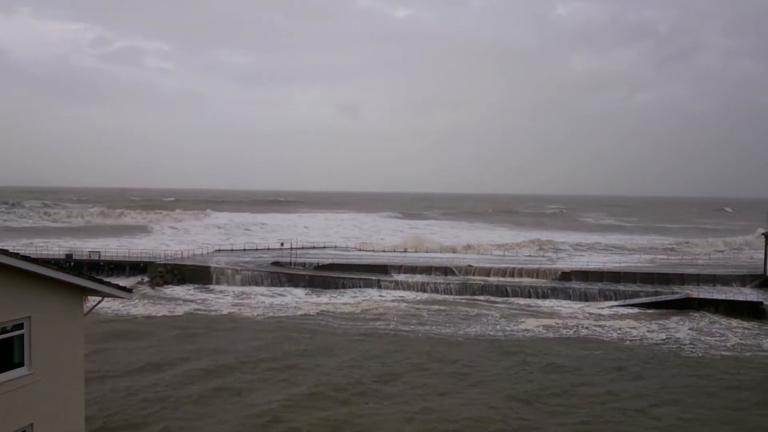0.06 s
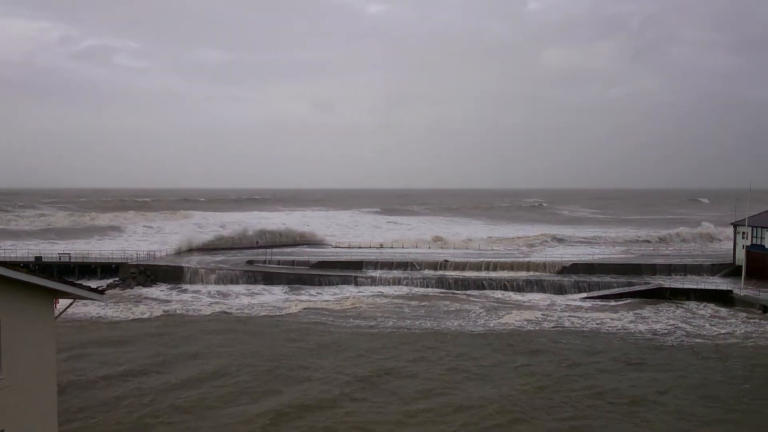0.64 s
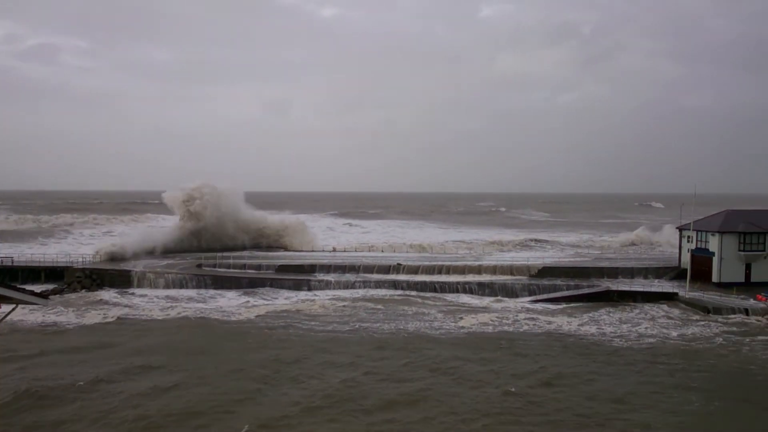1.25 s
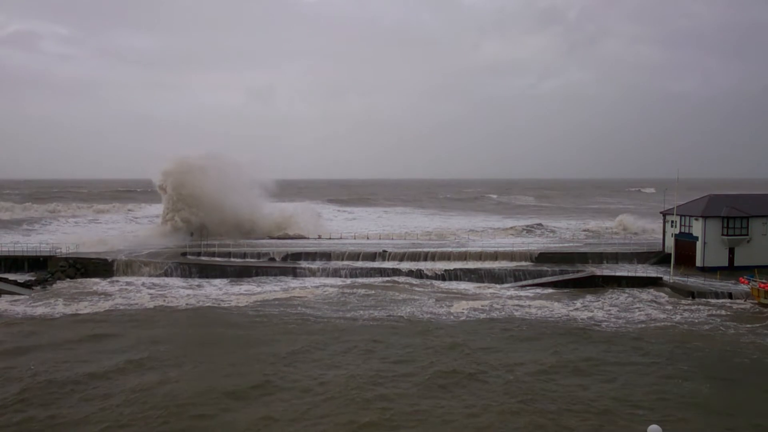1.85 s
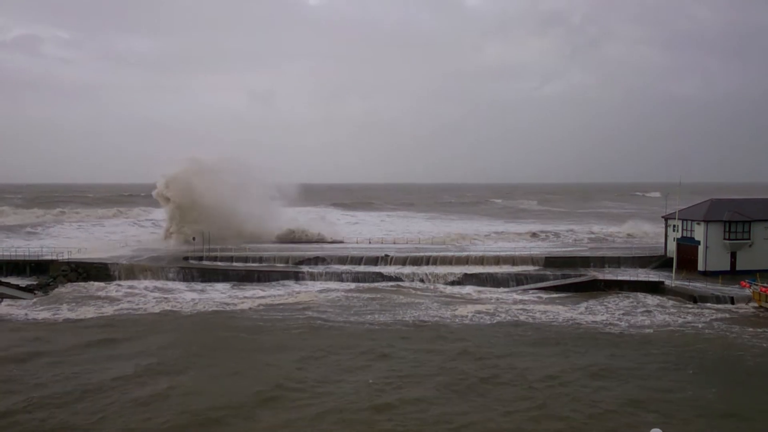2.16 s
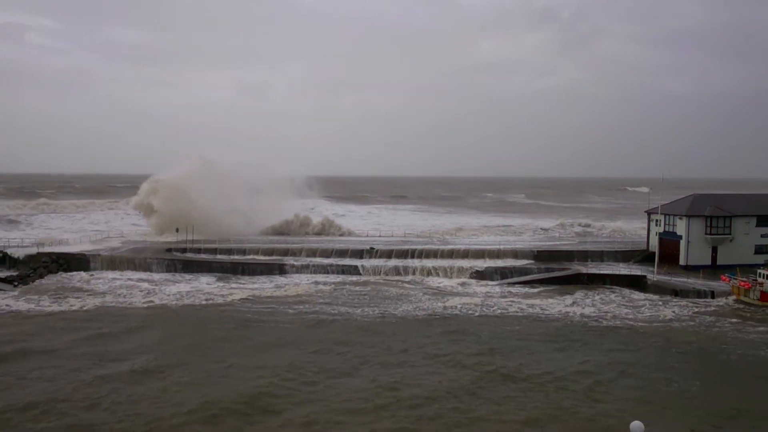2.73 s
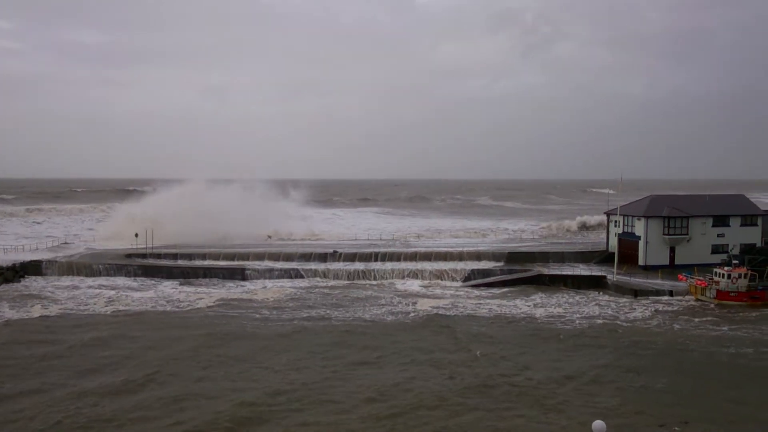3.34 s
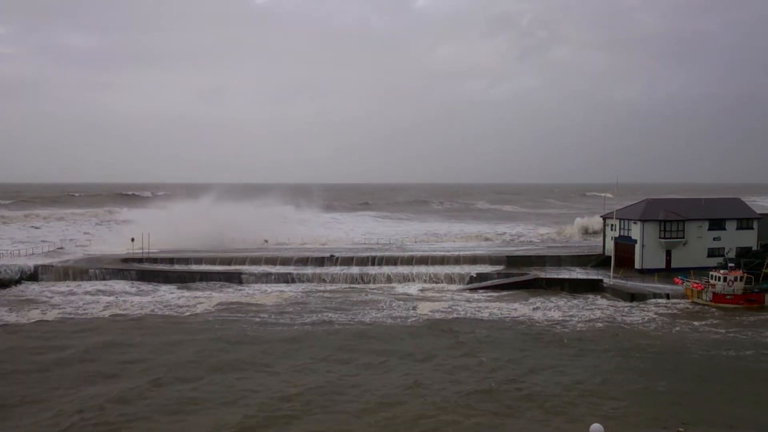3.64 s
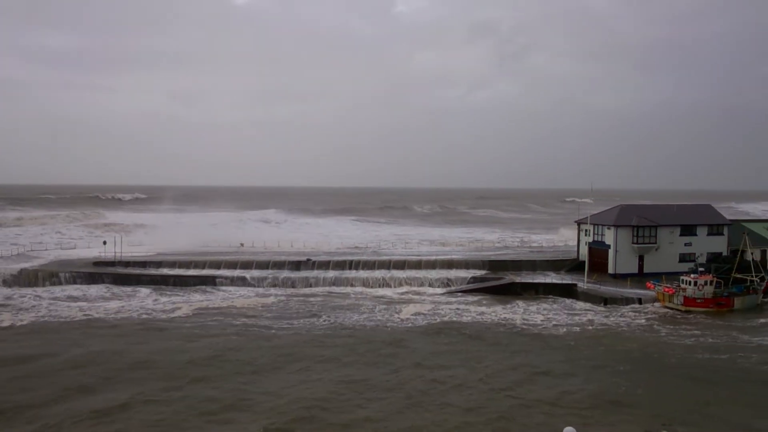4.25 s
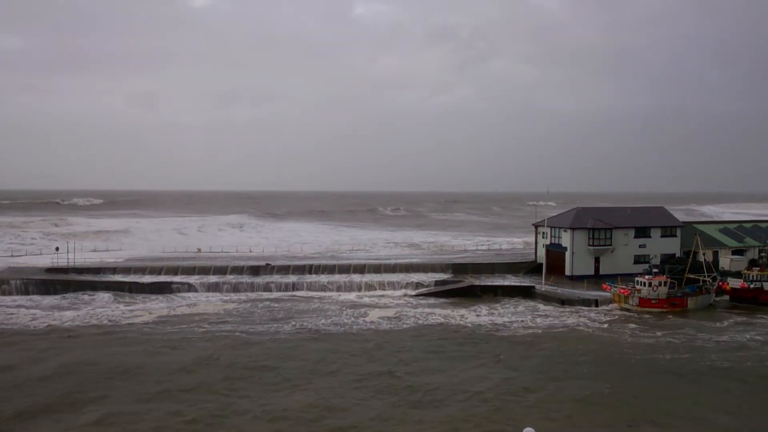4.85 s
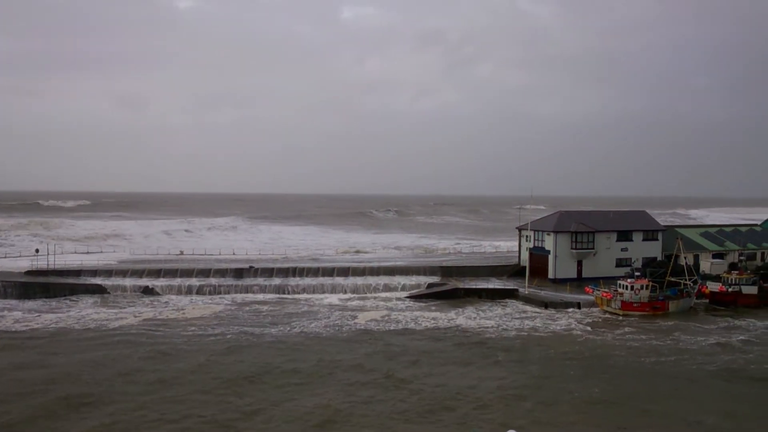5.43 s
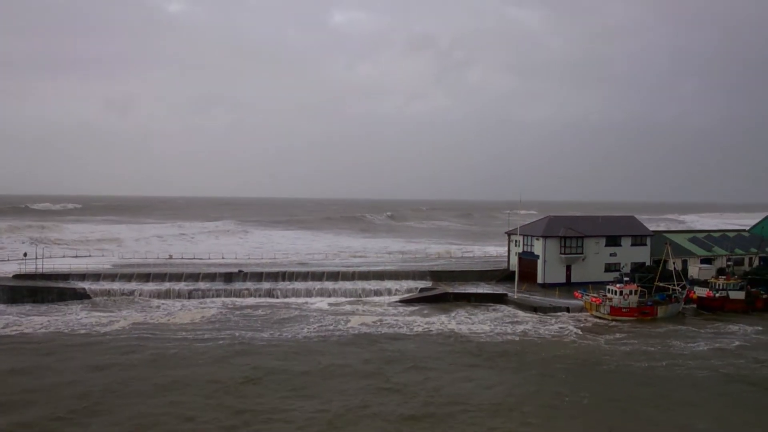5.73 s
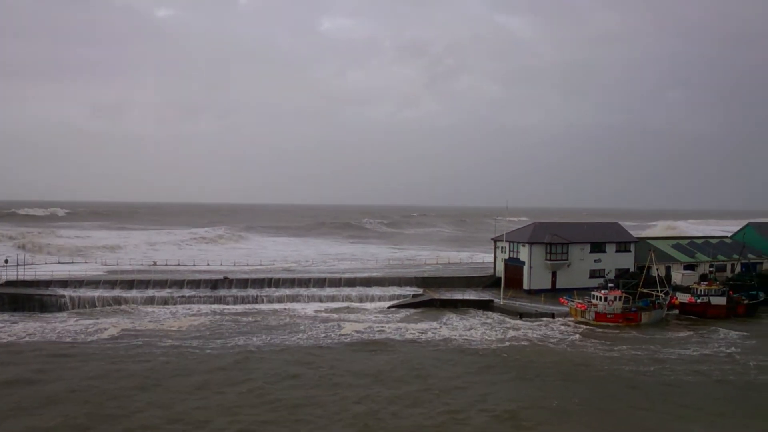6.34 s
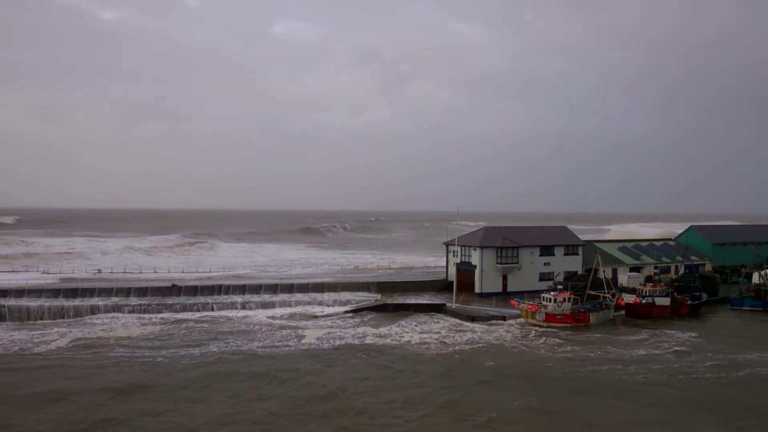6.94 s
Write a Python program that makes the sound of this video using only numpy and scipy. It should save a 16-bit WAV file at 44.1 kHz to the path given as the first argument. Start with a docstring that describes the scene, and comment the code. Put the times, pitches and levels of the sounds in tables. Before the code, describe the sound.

A gale blows straight onto the microphone above a harbour wall, making a loud, fluttering low rumble. Gusts swell unevenly from side to side, with dull thumps, quick slaps and small dry ticks, and the hardest blows briefly overload the sound. Behind the wind, heavy surf makes an even roar and hiss that dips under each big blow. A fine high hiss swells once near the end.

```python
"""Above a harbour wall, a gale blows straight onto a camera's two microphone ports.
Turbulent pressure gives each port its own rumble and fluttering eddies, and gusts swell over them.
Large eddies thump, small fast ones slap, and the smallest sputter as dry ticks; the heavy blows
overload the recorder. Behind the buffeting lies the even roar and hiss of heavy surf, which ducks
whenever the limiter catches a blow. A fine high hiss swells once near the end."""
import sys
import numpy as np
from scipy import signal
from scipy.fft import rfft, irfft
from scipy.io import wavfile
from scipy.ndimage import uniform_filter1d

SR = 44100
rng = np.random.default_rng(int(sys.argv[2]) if len(sys.argv) > 2 else 0)


def bounce(signal):
    """Save signal as a 16-bit WAV file at the path given by the first command-line argument."""
    frames = np.transpose(np.atleast_2d(signal))
    limited = np.clip(frames, -1, 1)
    pcm = np.round(limited * 32767).astype(np.int16)
    wavfile.write(sys.argv[1], SR, pcm)


N = 316638
TIME = np.arange(N) / SR
BINS = np.fft.rfftfreq(N, 1 / SR)

# Wind strength between gusts: time_s, level_db (levels in all tables are relative)
WIND_LEFT = [(0.0, -5.5), (0.3, -1.5), (0.83, -7), (1.1, -0.5), (1.47, -7.5), (1.97, -1), (2.71, -5.5),
             (3.33, 1.5), (3.52, 4), (4.13, -2.5), (4.25, -5.5), (4.73, -2.5), (5.14, -4.5), (5.8, -5),
             (6.22, -2), (6.46, -11), (6.93, 3), (7.18, 2.5)]
WIND_RIGHT = [(0.0, 4.5), (0.16, 7.5), (0.185, 0), (0.55, 2.5), (0.68, -17.5), (1.03, -18), (1.109, -2),
              (1.83, 1.5), (2.43, -4.5), (2.95, -6.5), (3.13, 2.0), (3.93, -4.5), (4.23, 4.5), (4.57, -3.5),
              (5.5, -12.5), (5.57, 0), (6.73, -9), (7.18, -1)]
# Gusts, and surges or lulls of the rumble, by port: centre_s, length_s, change_db
GUSTS = {"left": [(.42, 0.15, 8.5), (.686, .076, 9.5), (1.353, 0.099, 3), (1.536, 0.38, 5),
         (1.852, 0.12, 8.5), (2.524, 0.18, 5.5), (3.063, 0.3, 6.5), (3.85, 0.26, 5.5), (4.519, 0.14, 15.5),
         (5.425, .25, 7.5), (6.627, 0.26, 9.5)], "right": [(.424, 0.11, 3.5), (1.732, 0.057, 5.5),
         (2.305, .12, 7), (2.621, 0.34, 7), (2.761, 0.13, 9.5), (3.076, 0.12, -0.5), (3.384, 0.58, 3),
         (4.724, .33, 6), (4.921, 0.22, 7.5), (5.128, 0.2, 8), (5.329, 0.29, 9), (6.43, 0.18, 12),
         (6.95, 0.28, 6.5)]}
RUMBLE_SURGES = {"left": [(.17, .1, -6), (.38, 0.12, 4), (.55, .12, -3), (.78, 0.27, -6), (1.12, 0.55, -3),
                 (1.78, .1, -10), (3, 0.075, -10), (3.37, .1, -12), (3.67, 0.19, -2.5), (4.12, 0.2, 6.5),
                 (4.27, .12, -6), (4.72, 0.14, 3), (5.02, 0.13, 7), (5.13, 0.11, -6), (5.41, 0.077, 3),
                 (6.15, 0.4, 2), (6.35, 0.087, -5.5)], "right": [(.47, .24, 3.5), (.73, .1, -6),
                 (.99, 0.25, -6), (1.3, 0.12, -3), (2, 0.064, -7), (2.96, 0.13, -7), (3.21, 0.091, -8),
                 (3.97, .12, -4), (4.37, .28, 0), (5.03, 0.14, -5), (5.48, 0.13, -7), (5.85, 0.42, -1.5),
                 (6.25, 0.26, -4), (6.73, .08, -4), (6.9, .2, 3)]}
# Spectra of turbulence, from large eddies to fine: frequency_hz, density_db
RUMBLE_SPECTRUM = [(8, -62), (24, -35), (35, -16.5), (48, -5.5), (68, -4), (100, -8), (150, -14.5),
                   (230, -20), (450, -41), (1200, -100)]
BUFFET_SPECTRUM = [(50, -5), (110, -8), (180, -3), (300, -5), (500, -12.5), (900, -21), (1800, -35),
                   (4000, -88)]
RASP_SPECTRUM = [(200, -33), (450, 0.5), (700, -2.5), (1100, -8), (1600, -14), (2200, -24), (3200, -30),
                 (5000, -43), (12000, -81)]
SPIT_SPECTRUM = [(300, -12), (700, 7), (1300, -1), (2200, -7.5), (3400, -29), (14000, -73)]
def wind(port, strength, shield, rumble_db, buffet_db, rasp_db, spit_db, brightening, unrest_db):
    """Turbulent pressure at one port: large eddies rumble, small ones thud and rasp in brief bursts."""
    rumble_share, lull_db, shield_db = 0.48, 3.5, -1.5
    wind_db = np.interp(TIME, *np.transpose(strength)) + arches(GUSTS[port])
    wind_db += unrest_db * flutter(slow_hz=7.6, fast_hz=6.8)
    large_db = rumble_share * wind_db + arches(RUMBLE_SURGES[port])
    large_db += lull_db * np.tanh(flutter(slow_hz=7.7, fast_hz=11))
    eddies = 1.75 * np.tanh(flutter(slow_hz=17.6, fast_hz=79.3) / 0.92)
    rumble = steadied(noise(RUMBLE_SPECTRUM) * gain_of(eddies), span_s=0.045)
    buffet = steadied(noise(BUFFET_SPECTRUM) * gain_of(5.3 * eddies), span_s=0.057)
    lows = gain_of(large_db + rumble_db) * rumble + gain_of(wind_db + buffet_db) * buffet
    # The finest eddies ride inside the small ones and grow faster than they do in a gust.
    fine_gain = gain_of(wind_db + brightening * (wind_db - wind_db.mean()))
    bursts = steadied(gain_of(4.7 * eddies + 3.6 * flutter(slow_hz=60, fast_hz=282)), span_s=0.24)
    fiercest = steadied(bursts ** 1.55, span_s=0.14)
    spits = gain_of(spit_db) * fiercest * noise(SPIT_SPECTRUM)
    rasp = gain_of(rasp_db) * bursts * noise(RASP_SPECTRUM)
    return gain_of(shield_db * shield) * lows + fine_gain * (rasp + spits)


# Coupling of a blow to the ports: left_share, right_share
PORT_REACH = {"left": (1, 0), "right": (0, 1), "both": (1, 1)}
# Large eddies, by port: centre_s, length_s, pitch_hz, level_db
THUMPS = {"left": [(.645, .024, 110, 3.5), (1.356, .051, 99, -4), (1.867, .051, 102.8, -7),
          (2.115, .074, 139.9, 1), (2.182, 0.024, 106, 7.5), (2.521, .057, 111.8, -0.5),
          (3.171, 0.051, 135.7, -1.5), (3.538, 0.054, 117.4, 1.5), (3.624, .048, 166, 3.5),
          (3.889, 0.019, 168, 4.5), (4.044, 0.052, 117.6, -1.5), (4.469, 0.056, 178.4, 1.5),
          (4.513, 0.033, 249, 5.5), (4.72, .09, 111.2, -1.5), (4.963, 0.028, 136.6, 6.5),
          (5.256, .053, 118.3, 0), (5.419, .056, 112.7, -11), (5.621, .038, 67.5, 7.5),
          (6.588, .066, 95.9, 5.5), (6.685, 0.023, 144, 6), (7.005, .041, 128.3, 3.5),
          (7.055, 0.056, 134.9, 1)], "right": [(.038, 0.047, 195.4, -2.5), (.083, .04, 173, 6.5),
          (.409, .017, 296.6, 2.5), (.465, 0.015, 258.3, 6.5), (.553, 0.029, 124, 6),
          (.801, .061, 125, -9.5), (1.529, 0.035, 185.5, -4), (1.713, .038, 139.8, -1),
          (1.764, 0.033, 135.3, 1), (1.936, 0.04, 143, 4.5), (2.655, 0.053, 156.4, -2),
          (2.757, 0.018, 202, 1), (2.781, .05, 141.7, -1.5), (3.146, 0.015, 255.6, -1),
          (3.277, 0.037, 137.5, 2), (4.238, .035, 166.8, 2.5), (4.305, 0.039, 112.8, 2.5),
          (4.417, 0.035, 138.3, .5), (4.468, .029, 153, 2.5), (4.92, .036, 117, 1), (5.311, 0.025, 112, 2),
          (6.456, .067, 111, -4), (6.836, 0.027, 122.7, -4)], "both": [(.388, .035, 86.6, 0),
          (3.103, .05, 147, 2.5), (3.818, .04, 153, -0.5), (4.145, .04, 116.4, -1.5),
          (5.399, .014, 131, -0.5)]}
def thumps(gain_db, uneven_db):
    """Forced vibration: large eddies heave the diaphragms. Also gives their shielding of a port, 0-1."""
    swings, shield = np.zeros((2, 2, N))
    waver_octaves = .45
    pace = 2 ** (waver_octaves * flutter(slow_hz=35, fast_hz=90))
    for port, rows in THUMPS.items():
        for (centre_s, length_s, pitch_hz, level_db), phase in zip(rows, rng.random(len(rows))):
            near = abs(TIME - centre_s) < 2 * length_s
            offset = 2 * (TIME[near] - centre_s) / length_s
            cycles = phase + np.cumsum(pitch_hz * pace[near]) / SR
            envelope = gain_of(level_db + gain_db) * np.exp(-.55 * offset ** 4)
            swings[:, near] += np.outer(PORT_REACH[port], envelope * np.sin(2 * np.pi * cycles))
            shield[:, near] += np.outer(PORT_REACH[port], np.exp(-(offset / 2.6) ** 2))
    return swings * gain_of(uneven_db * flutter(slow_hz=26, fast_hz=80)), np.minimum(shield, 1)


# Spectra of a slap's low and high parts: frequency_hz, density_db
THUD_SPECTRUM = [(100, -7.5), (250, 0), (480, -4.5), (900, -30), (3000, -79)]
CRACK_SPECTRUM = [(1200, -13), (2800, 7), (4500, -8), (7000, -11.5), (13000, -25)]
# Slaps of air, by port: start_s, length_s, thud_db, rasp_db, crack_db
SLAPS = {"left": [(2.107, 0.0044, -4, -9.5, -45), (3.832, 0.0058, -12, -13.5, -24),
         (4.036, .005, -6.5, -10, -45), (4.522, 0.0057, -19, -10, -41)],
         "right": [(.016, 0.0029, -14, -10, -21), (.024, 0.013, -10, -14, -31), (.062, 0.0083, -1, -8, -28),
         (.102, 0.0033, -7, -15, -17.5), (.147, 0.0045, -10, -12, -23), (.164, 0.0061, -1, -4, -20),
         (.326, 0.0084, -7, -6, -32), (.405, 0.012, -5.5, -21, -27), (.457, 0.0084, -5.5, -12.5, -24),
         (.792, 0.011, -12.5, -28, -52), (1.517, 0.015, -3.5, -10.5, -20), (1.689, 0.0072, -10, -14, -25),
         (1.714, 0.0061, -18, -11, -30), (1.731, 0.0029, -13, -12, -32), (1.751, 0.0042, 3, -2.5, -25),
         (1.767, 0.0036, -26, 3, -29), (2.085, 0.0055, -8.5, -10.5, -49), (2.566, 0.0053, -6.5, -10, -29),
         (2.636, 0.02, -14.5, -11, -42), (2.749, 0.0088, -9.5, -11, -22.5), (3.078, 0.0033, -3, -10, -43),
         (3.138, 0.0041, -1, -6, -44), (3.2705, 0.003, -6, -1, -13.5), (3.287, .0025, 0.5, -4.5, -32),
         (3.679, 0.0059, -6.5, -4.5, -42), (3.788, 0.0055, -15, -6.5, -45), (4.133, 0.0058, -5.5, -4, -37),
         (4.199, .0012, -19, -7, -11), (4.218, 0.002, -3, -8, -27), (4.347, 0.0053, -15, -10.5, -45),
         (4.4, 0.007, -6, -10.5, -47), (5.305, 0.0057, -26, -9.5, -35), (5.333, 0.0069, -20, -11, -36),
         (5.56, 0.0068, -15, -12, -31), (5.648, 0.0035, -7.5, -6, -41), (6.372, 0.0058, -15, -9, -28),
         (6.409, 0.0046, -7, -14, -42), (6.822, 0.0051, -9.5, -17.5, -24.5), (6.945, .005, -4, -7.5, -35),
         (6.99, 0.0025, -4, -6, -42)]}
def slaps(thud_db, rasp_db, crack_db, rise_s, fall_s):
    """An abrupt pressure pulse is broadband: a small, fast eddy strikes with a thud, rasp and crack."""
    thud = gain_of(thud_db) * steadied(noise(THUD_SPECTRUM), span_s=0.0037)
    tearing = gain_of(6.1 * flutter(slow_hz=120, fast_hz=496))
    rasp = gain_of(rasp_db) * steadied(noise(SPIT_SPECTRUM) * tearing, span_s=0.0054)
    crack = gain_of(crack_db) * steadied(noise(CRACK_SPECTRUM) * tearing, span_s=0.0021)
    parts = np.array([thud, rasp, crack])
    pressure = np.zeros((2, N))
    for port, rows in SLAPS.items():
        for start_s, length_s, *parts_db in rows:
            near = (TIME > start_s) & (TIME < start_s + length_s + 10 * fall_s)
            age_s = TIME[near] - start_s
            envelope = (1 - np.exp(-age_s / rise_s)) * np.exp(-np.maximum(age_s - length_s, 0) / fall_s)
            blend = gain_of(parts_db) @ parts[:, near]
            pressure[:, near] += np.outer(PORT_REACH[port], envelope * blend)
    return pressure


# Spectrum of a tick: frequency_hz, density_db
TICK_SPECTRUM = [(300, -16), (900, 9), (2100, -6), (3200, -18), (4500, -26.5), (14000, -77)]
# Smallest eddies, by port: peak_s, level_db
TICKS = {"left": [(1.067, -21), (1.346, -28), (1.861, -18), (2.552, -21), (2.964, -30), (3.809, -27),
         (3.852, -21), (4.972, -19), (4.998, -22), (5.293, -22), (5.482, -17.5), (6.258, -27.5),
         (6.936, -18), (7.028, -17)], "right": [(.304, -18.5), (.128, -18), (.432, -17), (.441, -16),
         (.594, -21.5), (1.211, -22), (1.453, -17.5), (1.675, -27), (1.8, -25), (1.83, -14), (1.865, -20),
         (1.913, -16), (1.947, -18), (2.107, -23), (2.286, -17), (2.301, -15), (2.314, -22), (3.026, -22),
         (3.037, -17), (3.15, -16), (3.459, -12), (3.577, -21), (3.64, -19.5), (4.122, -16), (4.382, -23),
         (4.451, -19), (4.604, -19), (4.714, -19.5), (4.747, -14.5), (4.831, -21.5), (4.878, -21),
         (4.899, -27), (4.937, -20), (5.005, -16), (5.12, -26), (5.167, -21), (5.296, -16), (5.319, -15),
         (5.584, -14.5), (5.778, -19.5), (6.114, -18), (6.189, -18.5), (6.388, -21), (6.451, -28),
         (6.47, -21), (6.487, -19.5), (7.098, -13.5)]}
def ticks(gain_db, rise_s):
    """Intermittency of turbulence: the smallest eddies burst on a port as separate dry ticks."""
    envelopes = np.zeros((2, N))
    for port, rows in TICKS.items():
        for peak_s, level_db in rows:
            near = (TIME > peak_s - rise_s) & (TIME < peak_s + 10 * rise_s)
            age = (TIME[near] - peak_s) / rise_s + 1  # in rise times
            pulse = gain_of(level_db + gain_db) * age * np.exp(1 - age)
            envelopes[:, near] += np.outer(PORT_REACH[port], pulse)
    return envelopes * steadied(noise(TICK_SPECTRUM), span_s=0.0023)


# Spectrum of the surf as each port colours it: frequency_hz, density_db
SURF_LEFT = [(60, 7), (450, 7.5), (1000, -5), (1600, -7.5), (2300, -5), (4300, -7.5), (5100, -16),
             (7000, -27), (10000, -32.5), (14000, -40.5)]
SURF_RIGHT = [(60, 7.5), (450, -0.5), (1000, 0), (2000, -7.5), (2600, -9), (3200, -24), (3800, -10),
              (4900, -10.5), (6000, -9), (8500, -10), (10000, -19.5), (12000, -28.5), (14000, -32)]
# Level of the background surf hiss, which dips after loud wind blows and recovers: time_s, level_db
SURF_LEVEL = [(0, -49.5), (.2, -49), (.35, -46), (.6, -49), (1.25, -48), (1.55, -51), (1.8, -48),
              (2.15, -47.5), (2.4, -45.5), (2.75, -49), (3, -47), (3.2, -48), (3.5, -45), (3.7, -48.5),
              (4.4, -51), (5.2, -47.5), (5.4, -50.5), (5.6, -46), (6.1, -49), (6.37, -48.3), (6.7, -50),
              (7.18, -48)]
def surf(left_db, right_db, seethe_db):
    """Incoherent addition: distant surf merges into an even hiss, whose level dips and recovers."""
    level_db = np.interp(TIME, *np.transpose(SURF_LEVEL))
    level = gain_of(level_db + seethe_db * flutter(slow_hz=0.94, fast_hz=25))
    return level * np.array([gain_of(left_db) * noise(SURF_LEFT), gain_of(right_db) * noise(SURF_RIGHT)])


# Spectrum of the high hiss: frequency_hz, density_db
HISS_SPECTRUM = [(3000, -28), (7000, 7.5), (9500, 4), (11500, -6), (14000, -17)]
def high_hiss(left_db, right_db, peak_s, width_s):
    """Amplitude modulation: a fine hiss swells once over the surf under a Gaussian envelope."""
    swell = np.exp(-((TIME - peak_s) / width_s) ** 2)
    return swell * np.array([gain_of(db) * noise(HISS_SPECTRUM) for db in (left_db, right_db)])


def gain_of(db):
    """Amplitude ratio of a level in decibels."""
    return 10 ** (np.asarray(db) / 20)


def shaped_noise(response):
    """Spectral shaping: white noise is weighted bin by bin and scaled to an rms of 1."""
    x = irfft(rfft(rng.standard_normal(N)) * response, N)
    return x / np.sqrt(np.mean(x ** 2) + 1e-20)


def noise(spectrum):
    """Coloured noise of rms 1, its spectrum interpolated over log frequency."""
    hz, db = np.transpose(spectrum)
    return shaped_noise(gain_of(np.interp(np.log(BINS + 1), np.log(hz + 1), db)))


def flutter(slow_hz, fast_hz):
    """Random fluctuation of rms 1, high-passed at slow_hz and low-passed at fast_hz."""
    return shaped_noise(BINS / np.hypot(BINS, slow_hz) / (1 + (BINS / fast_hz) ** 2))


def steadied(x, span_s):
    """Division by the running rms holds the level steady and leaves the faster swings."""
    size = max(int(span_s * SR), 3)
    power = uniform_filter1d(uniform_filter1d(x ** 2, size), size)
    return x / np.sqrt(abs(power) + 1e-9)


def arches(rows):
    """Level change in dB from a sum of half-cosine swells and lulls."""
    lift_db = np.zeros(N)
    for centre_s, length_s, change_db in rows:
        near = abs(TIME - centre_s) < length_s / 2
        lift_db[near] += change_db * np.cos(np.pi * (TIME[near] - centre_s) / length_s)
    return lift_db


def scene():
    """Superposition at the two ports; the right one faces the wind more and rasps harder."""
    heaves, shield = thumps(gain_db=-3.13, uneven_db=4.0)
    left = wind("left", WIND_LEFT, shield[0], rumble_db=-6.5, buffet_db=-14.5,
                rasp_db=-23.5, spit_db=-33.5, brightening=0.17, unrest_db=2.07)
    right = wind("right", WIND_RIGHT, shield[1], rumble_db=-8.5, buffet_db=-12,
                 rasp_db=-22.0, spit_db=-29, brightening=0.5, unrest_db=2.2)
    blows = slaps(thud_db=6.0, rasp_db=2.0, crack_db=1.5, rise_s=0.00052, fall_s=0.00062)
    sputter = ticks(gain_db=11.0, rise_s=0.0009)
    wash = surf(left_db=17, right_db=14.5, seethe_db=1.13)
    hiss = high_hiss(left_db=-67, right_db=-45.0, peak_s=6.4, width_s=0.64)
    return np.array([left, right]) + heaves + blows + sputter + wash + hiss


def limiter(x, threshold_db, share, attack_s, peak_fall_db_per_s, makeup_db):
    """Compression: both channels duck by a share of the held peak's excess, then slowly recover."""
    peak_db = 20 * np.log10(abs(x).max(0) + 1e-9)
    fall_db = peak_fall_db_per_s * TIME
    held_db = np.maximum.accumulate(peak_db + fall_db) - fall_db
    excess_db = np.maximum(held_db - threshold_db, 0)
    lag = np.exp(-1 / (attack_s * SR))
    return x * gain_of(makeup_db - share * signal.lfilter([1 - lag], [1, -lag], excess_db))


def record(dry):
    """Overload in a band-limited chain: the input stage saturates on what gets past the limiter."""
    low_cut_hz, high_cut_hz = 26.7, 14400
    microphone = signal.sosfilt(signal.butter(4, low_cut_hz, "highpass", fs=SR, output="sos"), dry)
    held = limiter(microphone, threshold_db=-2.5, share=0.45, attack_s=0.038,
                   peak_fall_db_per_s=54.5, makeup_db=1)
    clipped = .99 * held / (1 + held ** 16) ** (1 / 16)
    lowpass = signal.firwin(511, high_cut_hz, window=("kaiser", 9), fs=SR)
    banded = signal.oaconvolve(clipped, lowpass[None], "same")
    return banded * signal.windows.tukey(N, .0005)  # soft ends


dry = scene()
out = record(dry)
bounce(out)
```